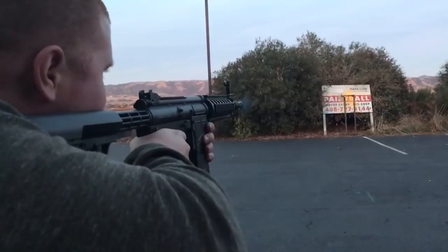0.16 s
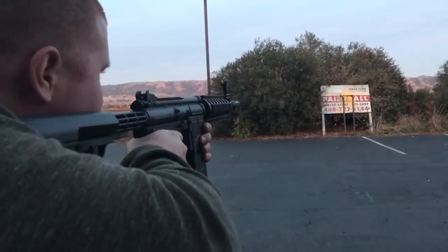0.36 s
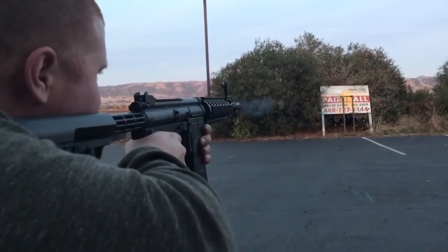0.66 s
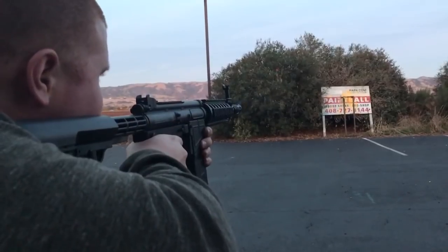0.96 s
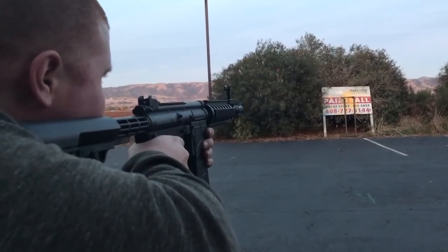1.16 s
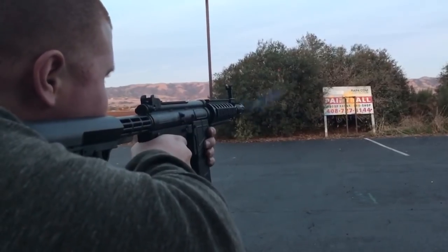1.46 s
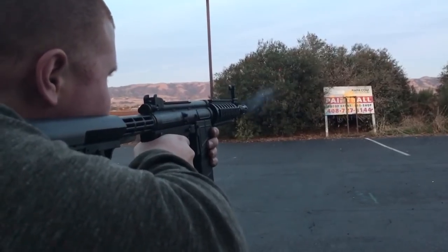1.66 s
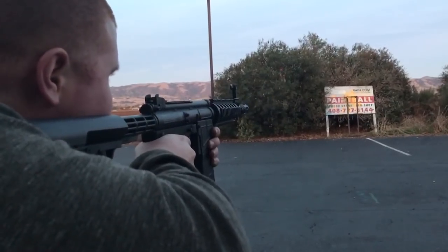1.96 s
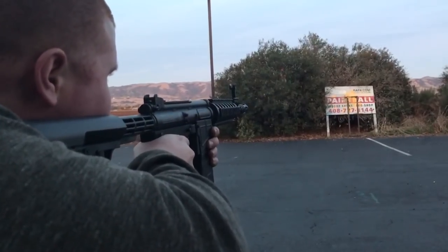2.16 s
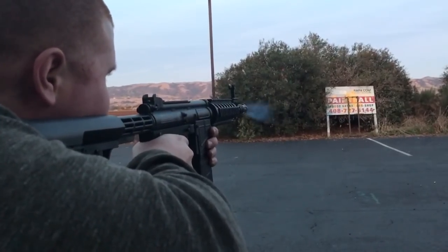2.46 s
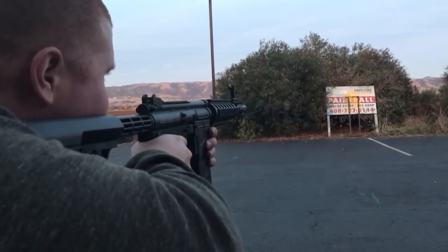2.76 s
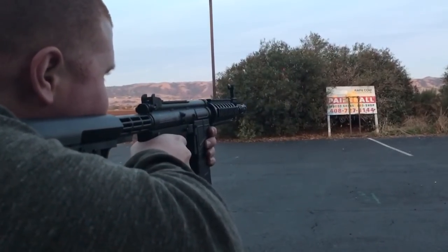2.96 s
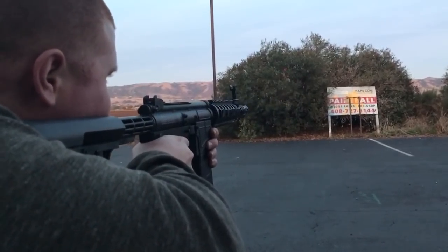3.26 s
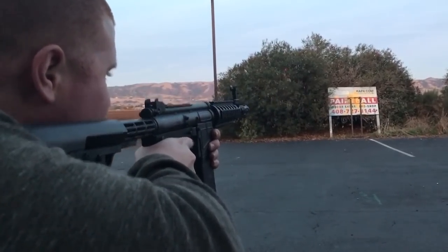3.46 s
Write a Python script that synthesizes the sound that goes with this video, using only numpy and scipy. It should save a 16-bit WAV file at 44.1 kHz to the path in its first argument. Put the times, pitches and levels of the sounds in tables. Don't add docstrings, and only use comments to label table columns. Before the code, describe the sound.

A paintball marker fires sixteen rapid, sharp gas pops close by in an open lot.

```python
import sys
import numpy as np
from scipy import signal
from scipy.fft import rfft, irfft, next_fast_len
from scipy.io import wavfile
from scipy.ndimage import map_coordinates

SR = 44100
rng = np.random.default_rng(int(sys.argv[2]) if len(sys.argv) > 2 else 0)


def level_to_linear(level):
    exponent = np.asarray(level, float) / 20
    return 10 ** exponent


def dump_mix(stems):
    frames = np.atleast_2d(stems).T
    limited = np.clip(frames, -1, 1)
    pcm = np.round(limited * 32767).astype(np.int16)
    wavfile.write(sys.argv[1], SR, pcm)


N = 158760
EMPTY_FROM_S = 3.05


def unit(x):
    return x / np.sqrt(np.mean(x ** 2) + 1e-20)


def along(points, hz):
    f, v = np.transpose(points)
    return np.interp(np.log(hz + 1), np.log(f + 1), v)


def noise(spectrum):
    m = next_fast_len(N)
    colour = level_to_linear(along(spectrum, np.fft.rfftfreq(m, 1 / SR)))
    return unit(irfft(rfft(rng.standard_normal(m)) * colour, m)[:N])


def wobble(rate):
    points = rng.standard_normal(int(N * rate / SR) + 4)
    return map_coordinates(points, [np.arange(N) * rate / SR])


def swell(s, db, t60, rise=0.00048):
    t = np.arange(N) / SR - s
    return level_to_linear(db - 60 * np.clip(t, 0, 9) / t60) * np.exp(np.clip(t, -1, 0) / rise)


def highpass(x, order, hz):
    return signal.sosfilt(signal.butter(order, hz, "high", fs=SR, output="sos"), x)


def strike(out, s, modes, db, scatter_db, steel=False):
    hz, level, t60 = np.transpose(modes)[:, :, None]
    i = max(int(np.ceil(s * SR)), 0)
    t = np.arange(i, min(N, i + int(t60.max() * SR))) / SR - s
    level = level + db + scatter_db * rng.standard_normal(hz.shape)
    phase, grow = 2 * np.pi * hz * t, 1
    if steel:
        beat_hz = rng.uniform(25, 90, (2, len(hz), 1))
        beat = 2 * np.pi * (beat_hz * t + rng.random((2, len(hz), 1)))
        depth = 0.3 * np.clip(hz / 3000, 0, 1.5) ** 2
        phase = phase + 2 * np.pi * rng.random(hz.shape) + depth * np.sin(beat[0])
        build = 1 - np.exp(-t * hz / 9)
        grow = build * level_to_linear(4 * depth * np.sin(beat[1]))
    out[i:i + len(t)] += np.sum(grow * level_to_linear(level - 60 * t / t60) * np.sin(phase), 0)


# (time [s], peak level [dB], sear over usual [dB], bolt over usual [dB])
SHOTS = [(0.2517, -8, 3, 3.5), (0.4838, -8, 2.5, 4), (0.6977, -7.5, 0.5, 3.7), (0.8912, -7, -3.5, 3.2),
         (1.0866, -7.5, -1.5, 5.3), (1.2954, -7.5, -0.5, 4.5), (1.488, -8, -3, 5), (1.6965, -5, -5, 1.8),
         (1.8956, -7.5, -1.5, 6), (2.095, -8, -3.5, 5.5), (2.3068, -8.5, -0.5, 5.5), (2.521, -7, -3, 3.5),
         (2.7145, -8.5, -1, 6), (2.9185, -9.5, -0.5, 6.6), (3.1186, -9, -1.5, -4.5),
         (3.3105, -9, -6.5, -3.5)]
# (time from the valve [s], level [dB])
SEAR_CLICKS = [
    (-.022, -37.5),
    (-.0172, -15),
    (-.0133, -14),
    (-.008, -20),
]
# (time after the valve [s], level [dB])
VALVE_SPURTS = [
    (0.0006, -4),
    (.003, -3.5),
    (.0056, 2),
    (.0085, -12),
    (.012, -7.5),
    (0.018, -12.5),
]
# (frequency [Hz], level [dB per Hz])
GAS_COLOUR = [(410, -12), (800, -2.5), (2040, -5.5), (2700, 2), (3600, -3.5), (6040, -8), (10400, -18),
              (15000, -14.5), (16500, -51)]
# (frequency [Hz], level [dB per Hz])
METAL_COLOUR = [(290, -36), (500, -22), (1090, -10.5), (2360, -3.5), (4420, -6.5), (5270, -2.5),
                (6860, -12), (14300, -18.5), (16500, -25)]
# (frequency [Hz], level [dB], t60 [s])
BODY_MODES = [(1078, -14.5, 0.013), (1690, 0, 0.013), (2515, 1, 0.019), (2857, -8.5, 0.0099),
              (3490, -5.5, 0.024), (4230, -22, 0.028), (5340, -8, 0.027)]


def marker():
    gas, metal, ring = np.zeros((3, N))
    body_db = -6.5
    for s, db, sear_db, bolt_db in SHOTS:
        for when, level in SEAR_CLICKS:
            level += db + sear_db + rng.normal(0, 0.86)
            when += s + rng.normal(0, 0.000444)
            metal += swell(when, level, t60=0.033, rise=0.00065)
            strike(ring, when, BODY_MODES, level + body_db, scatter_db=3)
        for when, level in VALVE_SPURTS:
            gas += swell(s + when, db + level + rng.normal(0, 2.7), t60=0.018)
            strike(ring, s + when, BODY_MODES, db + level + body_db, scatter_db=1.5)
        slam = s + 0.0304 - 0.0019 * (s > EMPTY_FROM_S)
        slam_db = db + bolt_db - 7
        metal += swell(slam, slam_db, t60=0.017, rise=0.0017)
        metal += swell(slam, slam_db - 11.5, t60=0.0031)
        metal += swell(slam, db - 30, t60=0.34, rise=0.0017)
        metal += swell(slam + 0.0078, slam_db - 15, t60=0.017)
        strike(ring, slam, BODY_MODES, slam_db - 0.5, scatter_db=1.5)
    spit = gas * noise(GAS_COLOUR) + metal * noise(METAL_COLOUR)
    spit = spit * level_to_linear(2.5 * wobble(1500))
    return highpass(spit, 4, 750) + ring


# (frequency [Hz], level [dB], t60 [s])
BARREL_MODES = [(155.2, -8, 0.054), (287.7, -10, 0.096), (449.5, -11, 0.043), (581, -10.5, 0.044),
                (910, -24.5, 0.09), (1052, -15, 0.041), (1180, -32.5, 0.14)]
POP_LAG_MS = [.2, .6, 0, .5, .5, .2, .1, .6, -.2, .1, -.2, -.3, -.2, -.2, -.2, 0]


def barrel():
    out, t = np.zeros(N), np.arange(N) / SR
    pop_db, rebound_s, round_s = -0.8, 0.001547, 0.0072
    for (s, *_), lag in zip(SHOTS, POP_LAG_MS):
        empty, ring = s > EMPTY_FROM_S, np.zeros(N)
        pop = s + (0.0073 if empty else 0.008) + lag / 1000
        modes = np.array(BARREL_MODES)
        if empty:
            modes[[1, 3, 4, 5, 6], 1] -= 29
        strike(ring, pop, modes[:4], pop_db + 3 * empty, scatter_db=0.7)
        strike(ring, pop + rebound_s, modes[4:], pop_db - 8 * empty, scatter_db=1.5)
        spent = swell(pop + round_s, 0, t60=0.014, rise=12)
        out -= ring * np.maximum(spent, level_to_linear(-16))
        build = np.clip((t - s) / (pop - s), 0, 1)
        push = level_to_linear(-9 + 1.8 * empty) * build ** 2
        hum = level_to_linear(-18) * np.cos(2 * np.pi * 560 * (t - s - 0.0008))
        out += (build < 1) * (build > 0) * (push + hum)
    return out


# (frequency [Hz], level [dB])
BRIGHT_COLOUR = [(1000, -13.5), (4000, -10), (9000, -2.5), (14000, 0), (16500, -0.5)]


def crack():
    return sum(swell(s + 0.001, db + 1.5, t60=0.011) for s, db, *_ in SHOTS) * noise(BRIGHT_COLOUR)


# (time [s], peak level [dB])
RESETS = [(0.15, -47), (0.3715, -31.5), (0.5801, -29), (0.7912, -30), (0.9901, -30), (1.1941, -29),
          (1.3955, -31), (1.5916, -31), (1.797, -27), (2.0024, -28), (2.2036, -30), (2.4194, -31),
          (2.623, -30), (2.818, -29), (3.022, -32), (3.217, -33), (3.412, -33)]
# (time [s], peak level [dB])
TICKS = [
    (.07, -48),
    (.173, -45),
    (.213, -47),
    (.352, -44),
    (.441, -43),
    (.452, -48),
    (.655, -48),
    (3.286, -44),
    (3.406, -37),
    (3.477, -48),
]
# (frequency [Hz], level [dB])
TICK_COLOUR = [(1500, -20), (3500, 9), (8000, 1), (12000, -20), (16500, -20)]


def trigger():
    resets, ticks = np.zeros((2, N))
    for s, db in RESETS:
        resets += swell(s, db + 6.5, t60=0.0077) + swell(s + 0.0078, db - 7, t60=0.015)
    for s, db in TICKS:
        ticks += swell(s, db, t60=0.012)
    return resets * noise(BRIGHT_COLOUR) + ticks * noise(TICK_COLOUR)


# (time [s], peak level [dB], thump level [dB], knock level [dB])
SPLATS = [
    (0.5328, -14.5, -32.5, -28),
    (0.7708, -12.5, -33.5, -24),
    (1.1574, -26, -34, -48),
    (1.1726, -24.5, -46, -38),
    (1.3619, -16.5, -26.5, -22),
    (1.576, -15.5, -31.5, -23.5),
    (1.979, -16.5, -36.5, -17.5),
    (2.5881, -16, -26, -20.5),
    (2.798, -15, -32.5, -20),
    (3.0028, -18, -29.5, -20),
]
# (frequency [Hz], level [dB per Hz])
SPLAT_COLOUR = [(180, -16), (300, -7), (567, -21), (1870, -15), (4930, -25), (6240, -24.5), (13700, -38),
                (16500, -35)]
# (frequency [Hz], level [dB], t60 [s])
BOARD_MODES = [(148.2, 3, 0.33), (198.4, 7, 0.13), (335, -1, 0.084)]
# (frequency [Hz], level [dB], t60 [s])
KNOCK_MODES = [(490, -8, 0.05), (1190, 4, 0.02), (1700, -1, 0.033), (2680, -15, 0.0144)]


def splats():
    burst, board = np.zeros((2, N))
    for s, db, thump_db, knock_db in SPLATS:
        burst += swell(s, db - 5.5, t60=0.046, rise=0.00017) + swell(s, db - 18, t60=0.22)
        strike(board, s, BOARD_MODES, thump_db, scatter_db=1.5)
        strike(board, s, KNOCK_MODES, knock_db, scatter_db=2.5)
    return burst * noise(SPLAT_COLOUR) + board


# (time [s], peak level [dB], ring over it [dB], brightness [dB per octave])
PANEL_HITS = [
    (0.9637, -12, -12, -2),
    (1.7531, -13, -20, 6),
    (2.3548, -14, -13, 0.5),
]
POST_HITS = [
    (2.165, -15, -11, -1),
    (3.173, -19.5, -6, -0.61),
]
RAIL_HITS = [
    (-0.04, -13.5, -12.5, 0.1),
]
# (frequency [Hz], level [dB], t60 [s])
PANEL_MODES = [(1464, -9, .45), (1744, -3, .45), (2256, -10, .15), (2514, 1, .24), (2767, -7, .22),
               (2902, -11, .2), (3210, -2, .28), (4116, -5, .22), (5288, -2, .25), (5609, -11, .14),
               (6660, -9, .13), (8059, -12, .1), (8807, -13, .1), (9491, -13, .1)]
POST_MODES = [(1109, -19, .8), (1389, -5, .38), (1611, -1, 1.2), (1658, -2, .6), (1739, -8, .5),
              (2137, -7, .4), (2261, -11, .27), (2406, -9, .2), (2579, -10, .24), (3542, -7, .2),
              (3736, -9, .2), (3935, -7, .22), (4450, -8, .15), (5286, -11, .25)]
RAIL_MODES = [(991, -9, 1.3), (3553, -13, .55), (1300, -11, .8), (1319, -4, 0.89), (1390, -10, .6),
              (1427, -1, 0.64), (5286, -14, .42), (1690, -3, 0.65), (1739, -5, 0.57), (1803, -12, 1.2),
              (2137, -3, 0.57), (2412, -4, 0.27), (2719, -11, 0.78), (4366, -5, 0.17)]
# (frequency [Hz], level [dB per Hz])
CLICK_COLOUR = [(1000, -20), (3000, -13), (6000, -2.5), (9500, -4.5), (11000, -13), (16500, -11)]
# (frequency [Hz], level [dB per Hz])
RATTLE_COLOUR = [(410, -55), (700, -9), (1500, 4), (1960, -4), (2600, -0.5), (5290, -5.5), (15200, -15),
                 (16500, -44)]


def frame():
    ring, shake, clicks = np.zeros((3, N))
    parts = ((PANEL_HITS, PANEL_MODES), (POST_HITS, POST_MODES), (RAIL_HITS, RAIL_MODES))
    for hits, modes in parts:
        for s, db, ring_db, tilt_db in hits:
            tilted = [(hz, level + tilt_db * np.log2(hz / 2500), t60) for hz, level, t60 in modes]
            strike(ring, s, tilted, db + ring_db, scatter_db=1, steel=True)
            hz = rng.uniform(1300, 10000, size=70)
            swarm = np.c_[hz, along(RATTLE_COLOUR, hz), 0.2 * (2000 / hz) ** 0.4]
            strike(ring, s, swarm, db - 22, scatter_db=4, steel=True)
            clicks += swell(s, db, t60=0.004, rise=0.0001)
            started = np.arange(N) > s * SR
            shake += swell(s + 0.004, db - 7, t60=0.05, rise=0.003) * started
            for late in 0.012 * rng.random(size=6):
                clicks += swell(s + late, db - 6 - 150 * late, t60=0.003, rise=0.0001)
    rattle = shake * noise(RATTLE_COLOUR) * level_to_linear(1.4 * wobble(360))
    return highpass(ring + clicks * noise(CLICK_COLOUR) + rattle, 3, 900)


# (frequency [Hz], t60 [s])
LOT_T60 = [(100, 0.48), (1000, 0.41), (5000, 0.28), (15000, 0.14)]


def lot(x):
    out, size = np.zeros(N + 2 * SR), SR // 5
    hedge_s, hedge_wide_s = 0.1, 0.014
    for i in range(0, N, size):
        hz, t, z = signal.stft(rng.standard_normal(SR // 2), SR, nperseg=256)
        tail = level_to_linear(-24 - 60 * t / along(LOT_T60, hz)[:, None])
        hedge = level_to_linear(-41.5) * np.exp(-0.5 * ((t - hedge_s) / hedge_wide_s) ** 2)
        echo = signal.istft(z * (tail + hedge), SR, nperseg=256)[1] / 30
        wet = signal.fftconvolve(x[i:i + size], echo)
        out[i:i + len(wet)] += wet
    return out[:N]


# (frequency [Hz], level [dB])
EARLIER_COLOUR = [(100, -15), (400, 4), (1500, 8.5), (6000, -8), (16000, -21)]


def earlier_shots():
    return swell(0, -37.5, t60=1) * noise(EARLIER_COLOUR)


# (frequency [Hz], level [dB per Hz])
FAR_COLOUR = [(18, -40), (30, -4), (103, -1.5), (266, -7.5), (1500, -9), (1630, -8), (1910, -18.5),
              (5740, -20.5), (16000, -45)]
# (time [s], level [dB])
FAR_LEVEL = [
    (0, -48.5),
    (1.5, -44),
    (3.3, -45),
    (3.45, -49.5),
    (3.6, -44.5),
]
# (time [s], level [dB])
WIND_LEVEL = [
    (0.0, -38),
    (1.54, -32),
    (2.48, -36.5),
    (2.83, -36.5),
    (3.6, -46),
]
# (frequency [Hz], level [dB])
RUMBLE_COLOUR = [(25, 5.5), (60, 7.5), (150, 1), (300, -5), (600, -42.5)]


def air():
    t = np.arange(N) / SR
    far_db = np.interp(t, *np.transpose(FAR_LEVEL)) + wobble(2.9)
    wind_db = np.interp(t, *np.transpose(WIND_LEVEL)) + 4.15 * wobble(25.35)
    return level_to_linear(far_db) * noise(FAR_COLOUR) + level_to_linear(wind_db) * noise(RUMBLE_COLOUR)


def scene():
    shots = marker() + barrel() + crack()
    hits = splats() + frame()
    return (shots + trigger() + hits + lot(shots) + earlier_shots() + air())[None]


def band_limit(x):
    return signal.sosfilt(signal.butter(12, 16990, fs=SR, output="sos"), x)


def record(dry):
    recover_s, ceiling, top_hz, top_fall_db = 0.31, 1.05, 15640, 32
    dry = highpass(dry, 2, 45)
    memory = recover_s * SR
    loud = signal.lfilter([1], [1, -np.exp(-1 / memory)], np.abs(dry)) / memory
    x = dry * level_to_linear(-3.5 * np.clip(loud / 0.12, 0, 2))
    x = x / (1 + np.abs(x / ceiling) ** 4) ** 0.25
    above_khz = np.clip(np.fft.rfftfreq(N, 1 / SR) - top_hz, 0, 3000) / 1000
    x = irfft(rfft(x) * level_to_linear(-above_khz * top_fall_db), N)
    return band_limit(x)


dry = scene()
out = record(dry)
dump_mix(out)
```